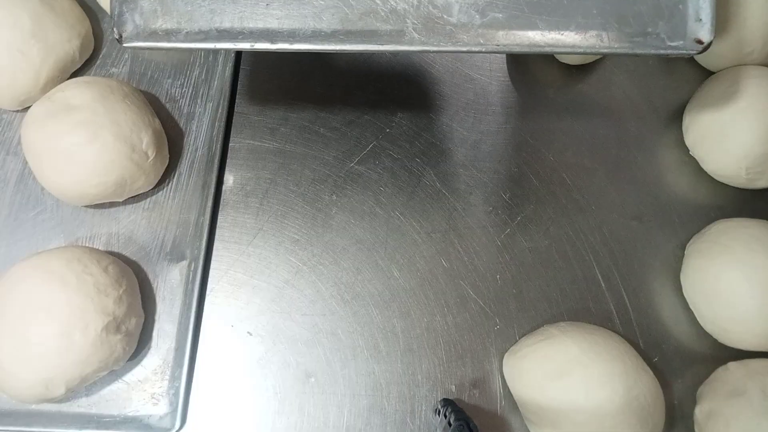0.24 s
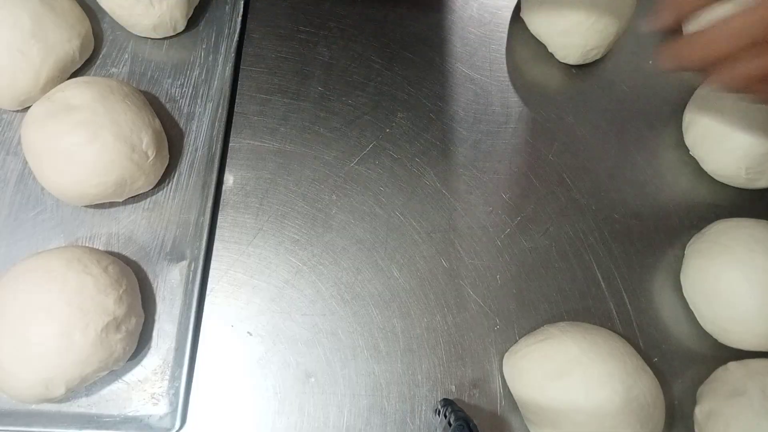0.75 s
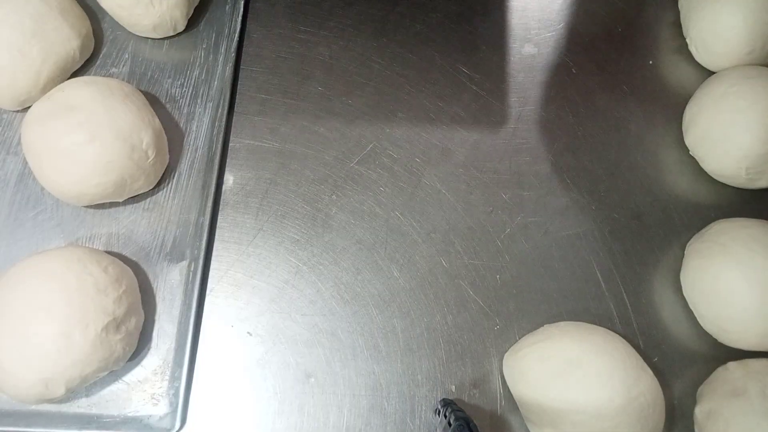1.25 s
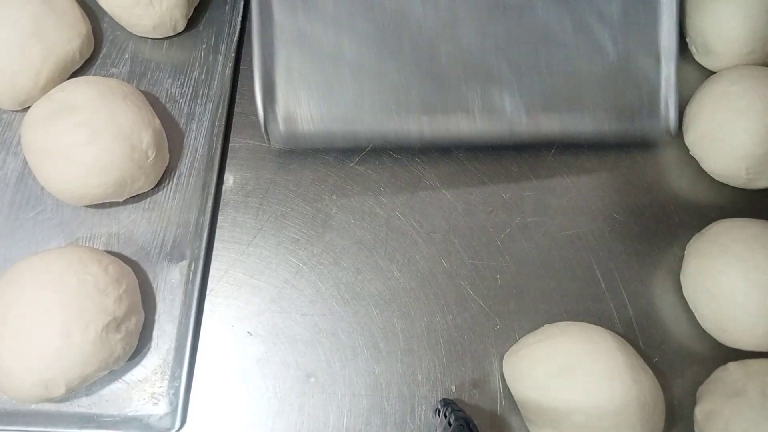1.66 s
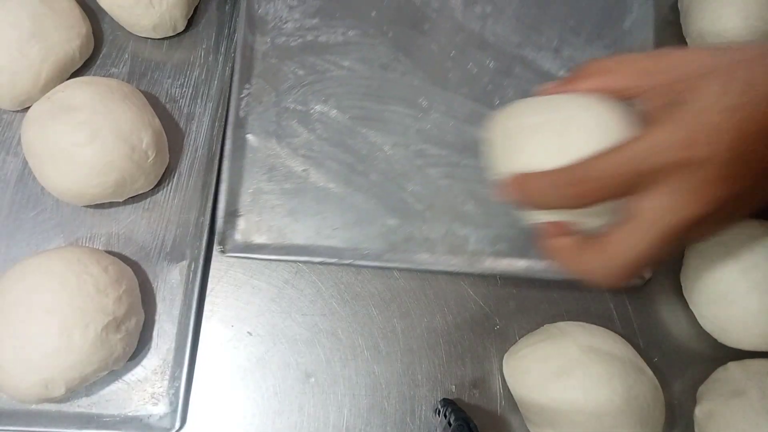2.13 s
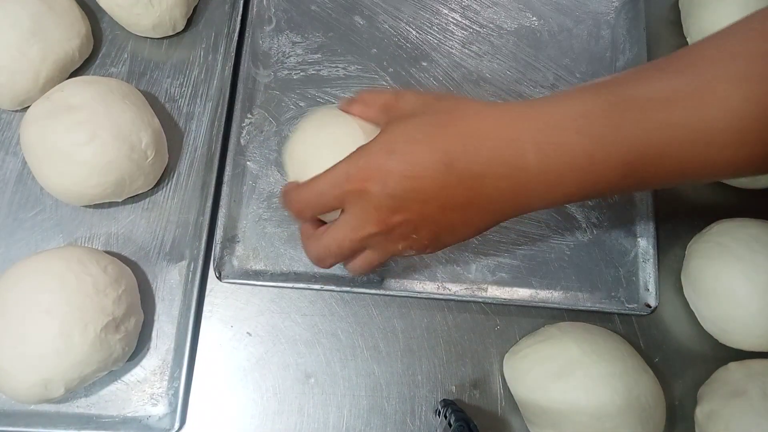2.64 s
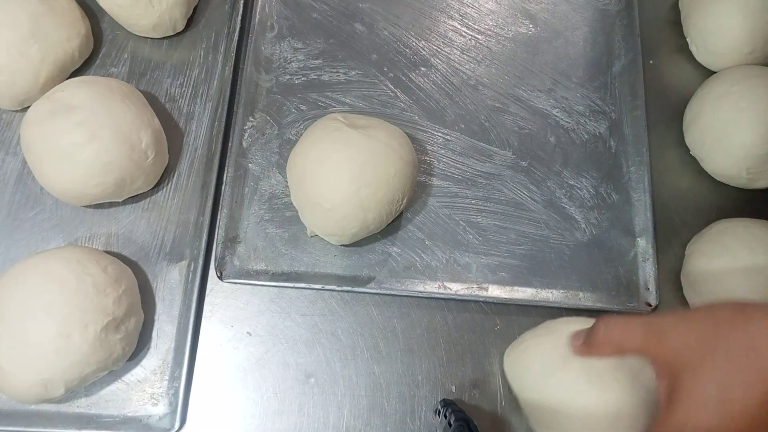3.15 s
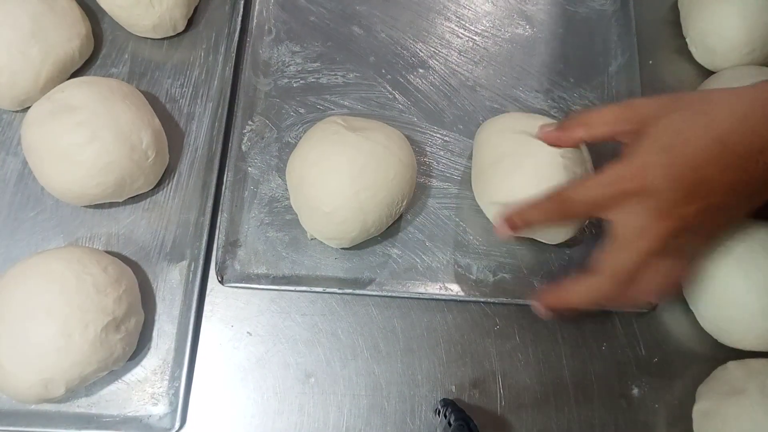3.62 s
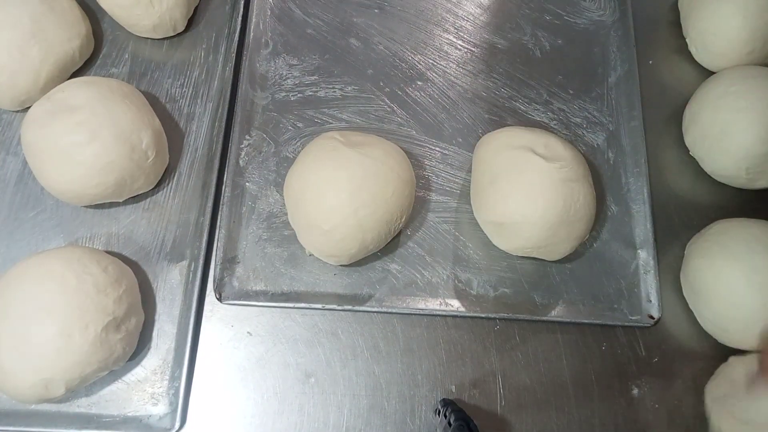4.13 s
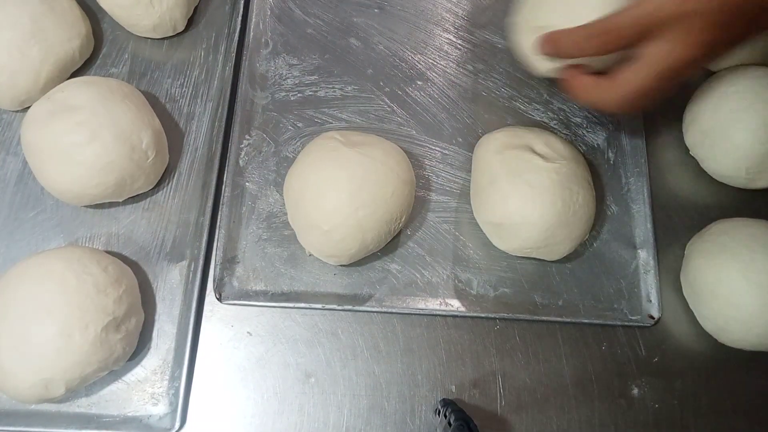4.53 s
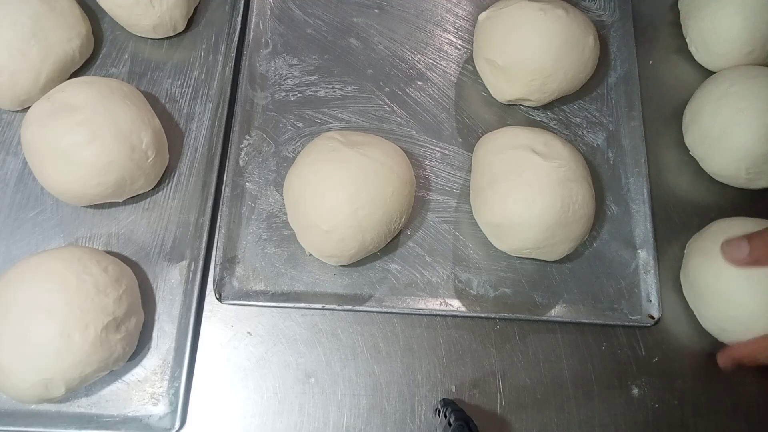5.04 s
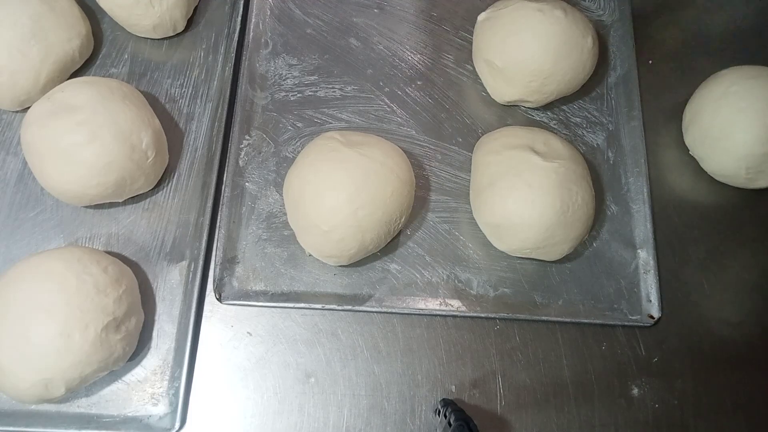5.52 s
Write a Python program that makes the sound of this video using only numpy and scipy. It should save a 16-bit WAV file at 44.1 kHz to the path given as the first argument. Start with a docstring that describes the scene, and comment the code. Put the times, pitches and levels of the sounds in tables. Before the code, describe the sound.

Dough balls slap a steel worktable and thump into a thin metal baking tray that clatters down, over a steady kitchen fan rush.

```python
"""A kitchen fan rushes steadily; a tray knocks and scrapes, then hands rub dough and dough hits a steel table.
The aluminium baking tray is dragged off, clatters down on the table and is loaded with dough.
Fan and hands are shaped noise; scrapes and rubs are built from tiny slips.
Each blow is a soft thud and a sharp slap or clack that ring the sheet metal's modes and a dense noise tail.
A touch on the tray's rim rings in thin, fuzzy bands, and sticky dough snaps free in short hisses."""
import sys
import numpy as np
from scipy import signal
from scipy.fft import rfft, irfft
from scipy.io import wavfile
from scipy.ndimage import uniform_filter1d

SR = 44100
rng = np.random.default_rng(int(sys.argv[2]) if len(sys.argv) > 2 else 0)


def wav_record(signal):
    """Record a signal, one row per channel, as 16-bit PCM in the file named by sys.argv[1]."""
    frames = np.transpose(np.atleast_2d(signal))
    bounded = np.clip(frames, -1, 1)
    # unit amplitude maps onto the largest positive 16-bit level
    quanta = np.round(bounded * 32767).astype(np.int16)
    wavfile.write(sys.argv[1], SR, quanta)


N = 254898  # length in samples
RING_T = np.arange(SR * 3 // 5) / SR  # time axis of one ringing sound, s
FILTER_HZ = np.fft.rfftfreq(8192, 1 / SR)  # frequencies at which filters are drawn


def amp(db):
    """Turns decibels into a gain."""
    return 10 ** (np.asarray(db) / 20)


def evened(x):
    """Scales to an rms of 1."""
    return x / np.sqrt(np.mean(x ** 2) + 1e-20)


def read(points, hz):
    """Reads between the points of a table, along a log-frequency axis."""
    f, value = np.transpose(points)
    return np.interp(np.log(hz + 1), np.log(f + 1), value)


# The steady rush of air, relative levels: (f/Hz, level/dB per Hz)
FAN_COLOUR = [(28, -35), (40, -4.5), (58, -4), (97, -11.5), (138, 1.5), (173, -12.5), (206, -7),
              (286, -11.5), (324, -5), (641, -10.5), (692, -20), (785, -8), (1510, -11), (2500, -18.5),
              (3390, -20), (5080, -43), (7410, -33), (9300, -49), (15800, -47.5)]
FAN_DB = -46  # overall rms level


def fan():
    """Moving air is steady noise, here filtered to the ventilation's colour."""
    hz = np.fft.rfftfreq(N, 1 / SR)
    spectrum = rfft(rng.standard_normal(N)) * amp(read(FAN_COLOUR, hz))
    return amp(FAN_DB) * evened(irfft(spectrum, N))


def add(mix, s, sound):
    """Mixes a sound in at time s, in seconds."""
    part = mix[round(s * SR):][:len(sound)]
    part += sound[:len(part)]


def coloured(x, gain):
    """Filters with the given gain at FILTER_HZ, without any sound before its cause."""
    log_gain = np.log(np.maximum(gain, 1e-6))
    circle = np.concatenate([log_gain, log_gain[-2:0:-1]])
    # the minimum-phase response puts the energy as early as possible
    response = np.exp(np.conj(signal.hilbert(circle)))
    taps = np.fft.ifft(response).real[:len(gain)]
    return signal.fftconvolve(x, taps)[:len(x)]


def soft(corner_hz, steep=3.21, lowest_hz=65):
    """A soft contact has no treble, and a thin sheet radiates little deep bass."""
    treble_loss = 1 + (FILTER_HZ / corner_hz) ** (2 * steep)
    bass_loss = 1 + (lowest_hz / (FILTER_HZ + 1)) ** 6
    return 1 / np.sqrt(treble_loss * bass_loss)


# Ring of the crowded upper modes and the kitchen, before the ring factor: (f/Hz, time to fall 60 dB/s)
DENSE_RING = [(80, 0.71), (200, 0.33), (560, 0.38), (1500, 0.36), (4000, 0.41), (10000, 0.19)]


def wash(ring, rise=0.0012):
    """Countless close modes and echoes blur into noise, each band dying at its own speed."""
    hz, t, bands = signal.stft(rng.standard_normal(len(RING_T)), SR, nperseg=256)
    t60 = read(DENSE_RING, hz)[:, None] * ring
    unit_energy = np.sqrt(2 * np.log(1000) / (t60 * SR))
    bands = bands * amp(-60 * t / t60) * unit_energy
    noise = signal.istft(bands, SR)[1][:len(RING_T)]
    return noise * (1 - np.exp(-RING_T / rise))


def sheet(modes, ring, spot, spot_db=4, spread_s=0.00013):
    """A metal sheet rings in clear modes; the spot that is struck favours some over others."""
    hz, db, t60 = np.transpose(modes)[:, :, None]
    index = np.arange(len(modes))[:, None]
    life = t60 * ring / np.log(1000)
    spot_gain_db = spot_db * np.cos(2 * np.pi * spot * index)
    height = amp(db + spot_gain_db) * 2 / (life * SR)
    swell = 1 - np.exp(-RING_T / spread_s)  # bending waves take a moment to fill the sheet
    tones = height * np.exp(-RING_T / life) * np.cos(2 * np.pi * hz * RING_T)
    return swell * tones.sum(0)


def contact(life):
    """A short spatter of tiny contacts, of unit energy."""
    size = rng.exponential(1, len(RING_T))
    spatter = rng.standard_normal(len(RING_T)) * size * np.exp(-RING_T / life)
    return spatter / np.linalg.norm(spatter)


MIDDLE_CORNER_HZ, BOOM_SLOPE = 500, 0.8  # boom rises this many octaves per octave of thud corner
SLAP_LEAD_S = 0.000878  # the surfaces touch just before the weight arrives


def blows(rows, rings, modes, colour, boom_hz, spot, push_db, boom_db, crack_db, tail_db, crack_s,
          clear_db, bounce_db, bass_hz=130, bounce_octaves=0.37, tick_db=-5, tick_s=0.01, clang_db=-6.0):
    """Each blow is a soft thud and a sharp slap; both are heard directly and ring the sheet."""
    out = np.zeros(N)
    for (s, thud_db, corner_hz, slap_db, bass_db), ring in zip(rows, rings):
        clear, dense = sheet(modes, ring, spot), wash(ring)
        push = amp(push_db) * (RING_T == 0)  # a single click, softened below

        # the load bounces on the springy sheet, which lifts one broad band, higher for a harder contact
        bounce_hz = boom_hz * (corner_hz / MIDDLE_CORNER_HZ) ** BOOM_SLOPE
        octaves_away = np.log2((FILTER_HZ + 1) / bounce_hz)
        bounce = bounce_db * np.exp(-(octaves_away / bounce_octaves) ** 2)
        deep_bass = bass_db / (1 + (FILTER_HZ / bass_hz) ** 4)
        weight = amp(thud_db + bounce + deep_bass)
        thud = push + amp(clear_db) * clear + amp(boom_db) * dense
        add(out, s, coloured(thud, weight * soft(corner_hz)))

        # first touch, then the rest settles
        crack = amp(tick_db) * contact(tick_s) + amp(crack_db) * contact(crack_s)
        slap = crack + amp(clang_db) * clear + amp(tail_db) * dense
        add(out, s - SLAP_LEAD_S, coloured(slap, amp(slap_db + read(colour, FILTER_HZ))))
    return out


# Knocks of the tray and dough landing in it; each level is a gain on its part of the blow:
# (t/s, thud level/dB, thud corner f/Hz, slap level/dB, deep bass level/dB)
TRAY_HITS = [(.600, 3, 610, -18.5, -12), (1.8777, 20, 670, -2, -2), (2.0083, 17.6, 660, -10, 9),
             (2.0186, 18, 630, -8.5, -9), (2.2548, 20, 930, -10, -9), (2.2638, 24.2, 1134, -1, -7.5),
             (2.3172, 21, 840, 2, -2), (2.795, 2, 394, -27, 12), (3.6975, 23, 513, -11, -0.5),
             (4.714, 13.5, 344, -14.5, 1), (4.75, 11, 181, -44, 2)]
# Clear tones of the tray, before the ring factor: (f/Hz, level/dB, time to fall 60 dB/s)
TRAY_TONES = [(76, 1, 0.5), (90, 4, 0.49), (120, -1, 0.48), (152, 7, 0.46), (188, 0, 0.44), (231, 5, 0.41),
              (333, 4, 0.37), (355, 5, 0.37), (402, -7, 0.35), (468, 1, 0.33), (498, 0, 0.32),
              (565, -7, 0.32), (660, -8, 0.32), (783, 3, 0.31), (829, 9, 0.31), (926, 9, 0.31),
              (1040, 2, 0.31), (1230, 9, 0.3), (1465, 2, 0.3), (1690, 0, 0.29), (1992, 3, 0.28),
              (2196, -1, 0.28), (2451, -2, 0.27), (2910, 3, 0.26), (3144, 2, 0.26), (3290, 0, 0.26)]
# Colour of a hard metal edge: (f/Hz, level/dB)
EDGE_CLACK = [(100, -64.5), (1000, 13), (2100, 10), (2600, 6), (3300, 7.5), (4200, -2.5), (5000, -14),
              (6800, -2.5), (10000, -16.5), (13000, -21), (15500, -16)]
# When each ball lands in the tray: (t/s)
BALL_LANDINGS = [2.25, 3.69, 4.70]
TRAY_RING, BALL_DAMPING = 1.29, 0.8  # ring time factor when empty, share left by each ball
TRAY_BOOM_HZ = 172  # boom at the middle thud corner


def tray():
    """The tray clatters freely while empty, and every ball that lands in it damps it further."""
    balls = [np.searchsorted(BALL_LANDINGS, row[0]) for row in TRAY_HITS]
    rings = [TRAY_RING * BALL_DAMPING ** count for count in balls]
    return blows(TRAY_HITS, rings, TRAY_TONES, EDGE_CLACK, boom_hz=TRAY_BOOM_HZ, spot=0.35,
                 push_db=-11.5, boom_db=-1.0, crack_db=-4.0, tail_db=-2.5, crack_s=0.018,
                 clear_db=1.5, bounce_db=3)


def friction(length, grain_db=2.5, grains_per_s=2500, fade=0.3):
    """A stroke is a row of tiny slips of uneven size that come in clumps, swell and fade."""
    chance = rng.random(SR)
    size = np.minimum(rng.exponential(1, SR), 4)
    clump_db = 3 * evened(uniform_filter1d(rng.standard_normal(SR), 600))
    direction = rng.choice([-1, 1], SR)
    slips = evened((chance < grains_per_s / SR) * amp(grain_db * size + clump_db) * direction)
    count = min(round(length * SR), SR)
    stroke = slips[:count] * signal.windows.tukey(count, min(fade, 1))
    return np.pad(stroke, (0, SR - count))


# The tray sliding and shifting, levels before a shared cut of 10 dB:
# (start t/s, length t/s, rumble level/dB, rasp level/dB)
TRAY_SLIDES = [(0.603, 0.14, -11, -40.5), (1.695, 0.13, -18, -42), (2.775, 0.018, -17.5, -38.5),
               (3.284, 0.029, -22, -34), (3.673, 0.0216, -9, -27), (4.96, 0.042, -17.5, -39.5),
               (5.513, 0.019, -21, -32.5), (5.549, 0.025, -17, -32)]


def scrapes(corner_hz=570, hollow_hz=380, dense_db=0):
    """The tray's underside slips on the steel and rings its modes."""
    out = np.zeros(N)
    for s, length, rumble_db, rasp_db in TRAY_SLIDES:
        body = sheet(TRAY_TONES, 0.45, .3) + amp(dense_db) * wash(0.42)
        rumble = amp(rumble_db) * soft(corner_hz, steep=6.2, lowest_hz=hollow_hz)
        rasp = amp(rasp_db + read(EDGE_CLACK, FILTER_HZ))
        ringing = signal.fftconvolve(friction(length), body)
        add(out, s, coloured(ringing, (rumble + rasp) * amp(-10.0)))
    return out


def in_kitchen(dry, room_db):
    """Adds a little room to a quiet sound."""
    return dry + amp(room_db) * signal.fftconvolve(dry, wash(1))[:N]


# Hands rubbing and pulling dough, levels before room and colour: (start t/s, length t/s, level/dB)
HAND_STROKES = [(0.746, 0.15, -52), (1.134, 0.22, -52.5), (2.034, 0.27, -50.5), (3.253, .25, -48.5),
                (3.643, .14, -48.5), (3.829, 0.22, -52.5), (4.201, 0.15, -48.5), (4.78, 0.066, -56),
                (5.303, 0.35, -52)]
# Colour of skin on dough, relative levels: (f/Hz, level/dB per Hz)
DOUGH_HISS = [(2650, 3), (4500, -6.5), (5210, -17.5), (5990, -9.5), (7000, -1.5), (10200, -13.5),
              (12800, -11.5), (14900, -12), (15600, 3.5)]


def rubs():
    """Skin on dough makes many tiny slips: a fine, high hiss."""
    dry = np.zeros(N)
    for s, length, db in HAND_STROKES:
        add(dry, s, amp(db) * friction(length, grain_db=0.0, grains_per_s=4900, fade=0.86))
    return coloured(in_kitchen(dry, room_db=-3), evened(amp(read(DOUGH_HISS, FILTER_HZ))))


# Dough landing on the table; each level is a gain on its part of the blow:
# (t/s, thud level/dB, thud corner f/Hz, slap level/dB, deep bass level/dB)
TABLE_HITS = [(1.0322, 26.5, 440, -2.5, -15), (1.094, 5.5, 466, -14, -3), (3.2194, 26, 298, -31, -8.5),
              (3.2346, 21, 270, -23, -8), (4.0798, 30, 732, 0, -7.5), (5.1511, 24, 620, -2, -3.5),
              (5.267, 13, 513, -14.5, -2.5), (5.504, 9, 520, -22, -11), (5.618, 0.5, 393, -27, -4)]
# Clear tones of the table top, before the ring factor: (f/Hz, level/dB, time to fall 60 dB/s)
TABLE_TONES = [(86.8, 4, 0.96), (116.7, 14.5, 0.26), (133.4, 13.5, 0.2), (167.1, 8.5, 0.43),
               (187.9, 4.5, 0.43), (237.3, 8, 0.43), (263, 4, 1), (334, 3.5, 0.33), (373, 4, 0.36),
               (391, 3, 0.13), (437, 6.5, 0.79), (475.4, 10, 0.27), (504.5, 6, 0.48), (520, 5, 0.7),
               (590, -6, 0.29), (666, -1, 0.33), (720, -12, 0.29), (765, 12, 0.36), (848, 9, 0.57),
               (913, 9.5, 0.24), (1012, 6, 0.3), (1090, -2, 0.46), (1120, 13, 0.57), (1246, 9.5, 0.31),
               (1614, 8, 0.31), (1760, 18, 0.38), (1960, 21, 0.28)]
# Colour of a wet slap: (f/Hz, level/dB)
WET_SLAP = [(100, -93), (1000, 0.5), (2000, 7), (2600, 0), (3400, 5), (4200, -4), (5000, -10), (7000, 1.5),
            (10000, -14), (13000, -19), (15500, -15)]
TABLE_RING, TABLE_HALVING_DB = 2.13, 24.5  # ring time factor of a 0 dB thud, thud dB that halve it
TABLE_BOOM_HZ = 266.6  # boom at the middle thud corner


def table():
    """Dough slaps the steel top and sticks; the heavier the ball, the sooner the boom dies."""
    rings = [TABLE_RING * .5 ** (thud_db / TABLE_HALVING_DB) for _, thud_db, *_ in TABLE_HITS]
    return blows(TABLE_HITS, rings, TABLE_TONES, WET_SLAP, boom_hz=TABLE_BOOM_HZ, spot=0.2543,
                 push_db=-10.0, boom_db=0.0, crack_db=-5, tail_db=-3.0, crack_s=0.03,
                 clear_db=1.0, bounce_db=3)


# A light touch on the tray's rim: (f/Hz, level/dB, time to fall 60 dB/s)
RIM_TONES = [(2350, -42, 0.29), (2961, -42.5, 0.38), (4600, -52, 0.35), (6900, -47, 0.27),
             (7050, -44.5, 0.25), (13300, -65, 0.25)]
PING_S = 1.636  # start


def ping(rise=0.017, width_hz=110, scuff_db=-24, scuff_s=0.04):
    """The rim is scuffed as the tray is lifted and rings in thin, fuzzy bands."""
    out = np.zeros(N)
    add(out, PING_S, amp(scuff_db) * contact(scuff_s))
    b, a = signal.butter(2, width_hz, fs=SR)
    for hz, db, t60 in RIM_TONES:
        # slow noise makes each tone flutter, which widens it into a band
        flutter = evened(signal.lfilter(b, a, rng.standard_normal(len(RING_T))))
        level = amp(db - 60 * RING_T / t60) * (1 - np.exp(-RING_T / rise))
        add(out, PING_S, level * flutter * np.sin(2 * np.pi * hz * RING_T))
    return out


# Sticky dough snapping free of the steel, levels before room and colour: (t/s, level/dB, pitch f/Hz)
DOUGH_SNAPS = [(4.872, -45.5, 9800), (5.336, -38.5, 9550)]
SNAP_S, SNAP_WIDTH_HZ, SNAP_PEAK_DB = 0.0093, 750, 11.5  # length, width and lift of the pitched band


def snaps():
    """A sticky patch lets go: a short burst of the dough hiss with one band lifted."""
    out = np.zeros(N)
    for s, db, hz in DOUGH_SNAPS:
        dry = np.zeros(N)
        add(dry, s, amp(db) * friction(SNAP_S, grain_db=2.0, grains_per_s=7300, fade=0.35))
        band_db = SNAP_PEAK_DB * np.exp(-((FILTER_HZ - hz) / SNAP_WIDTH_HZ) ** 2)
        colour = evened(amp(read(DOUGH_HISS, FILTER_HZ) + band_db))
        out += coloured(in_kitchen(dry, room_db=-1), colour)
    return out


def scene():
    """Adds fan, tray, hands and table together in one channel."""
    return (fan() + tray() + scrapes() + rubs() + table() + ping() + snaps())[None]


EDGE_HZ = 15650  # top of the heard band


def record(dry):
    """Removes the treble above EDGE_HZ with a steep low-pass filter."""
    low_pass = signal.firwin(511, EDGE_HZ, window=("kaiser", 9), fs=SR)
    return signal.oaconvolve(dry, low_pass[None], "same")


dry = scene()
out = record(dry)
wav_record(out)
```